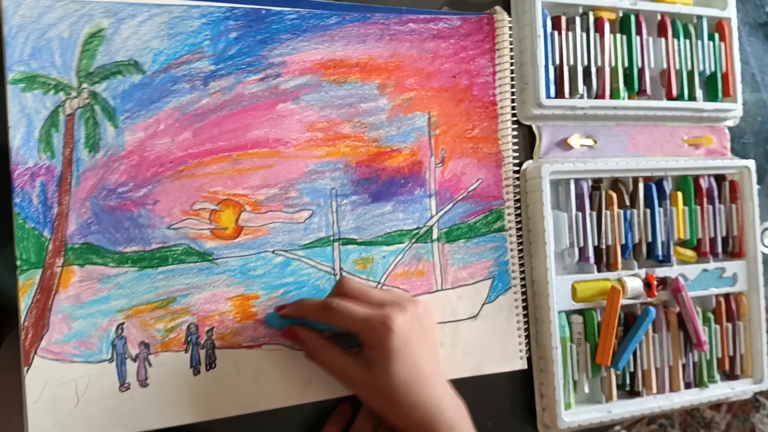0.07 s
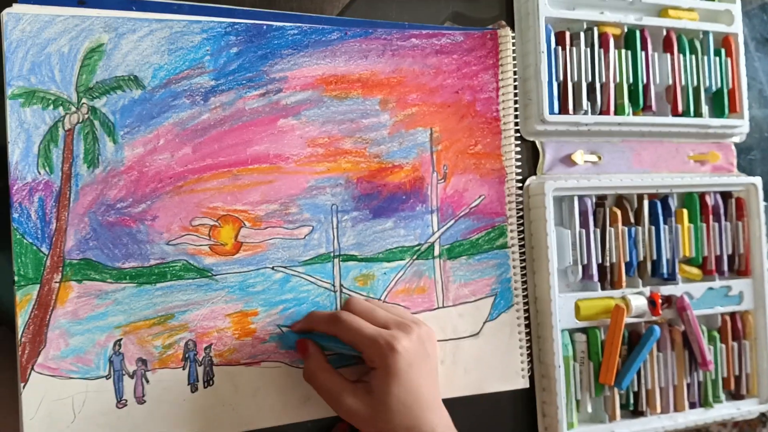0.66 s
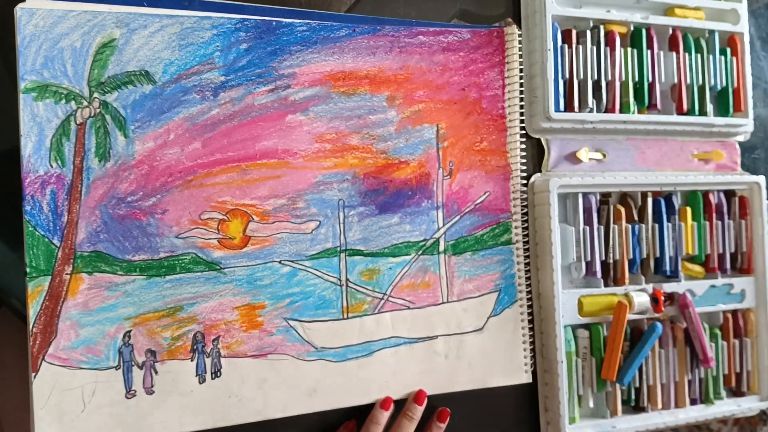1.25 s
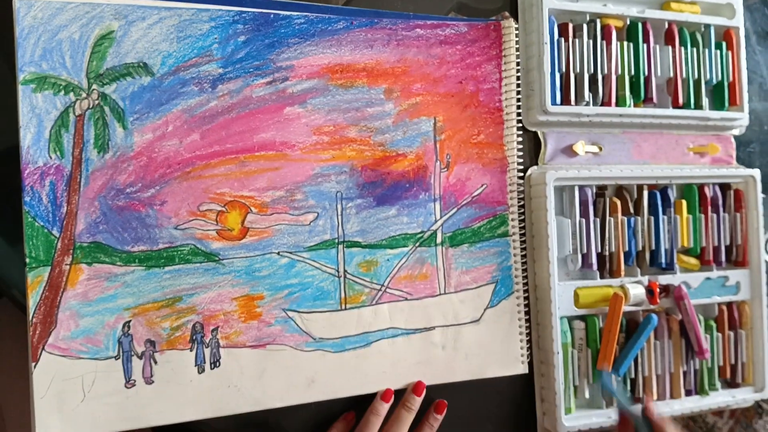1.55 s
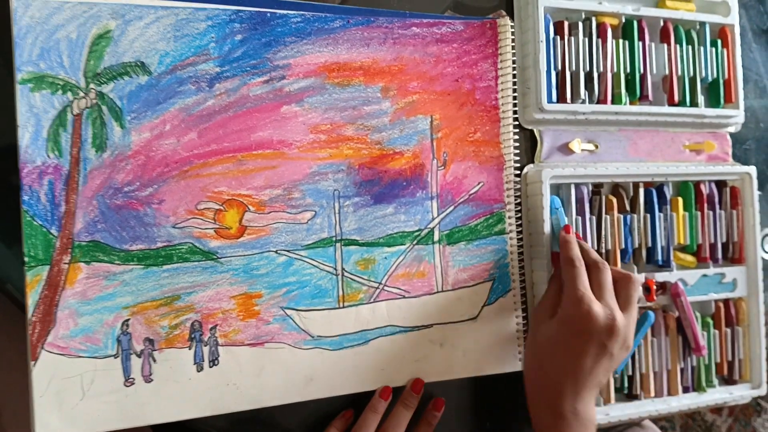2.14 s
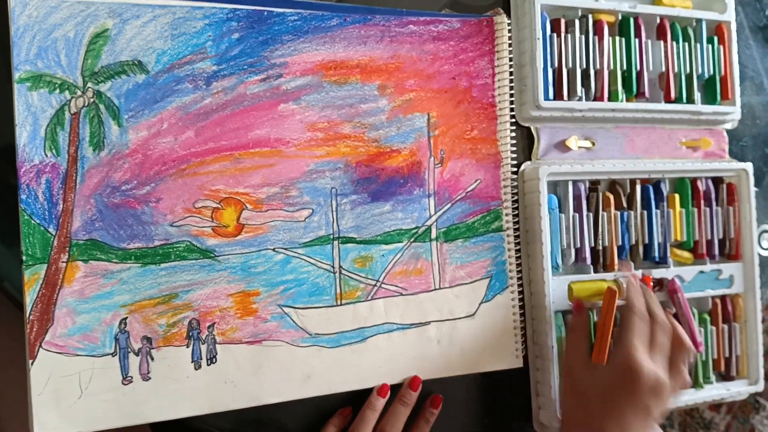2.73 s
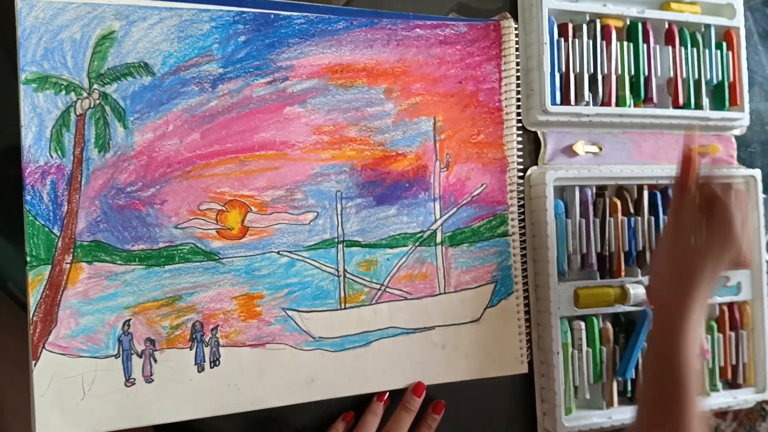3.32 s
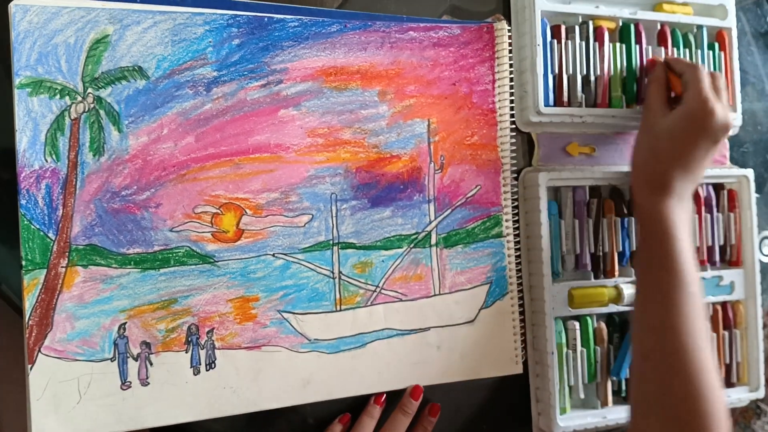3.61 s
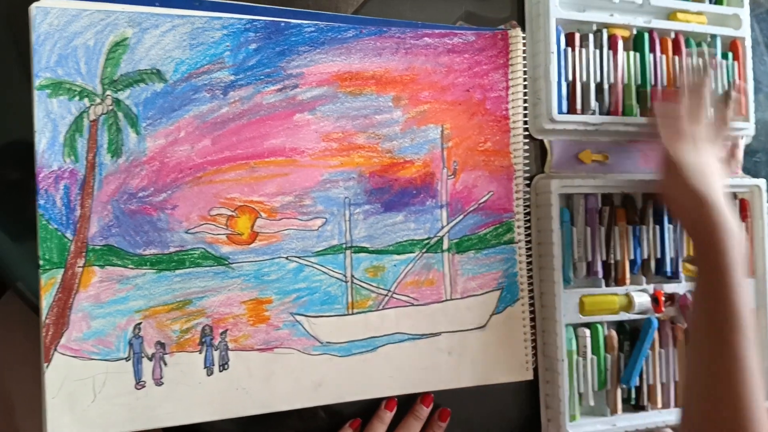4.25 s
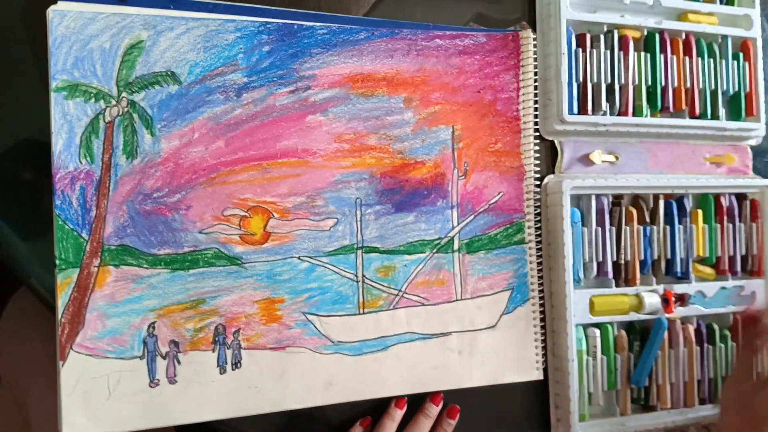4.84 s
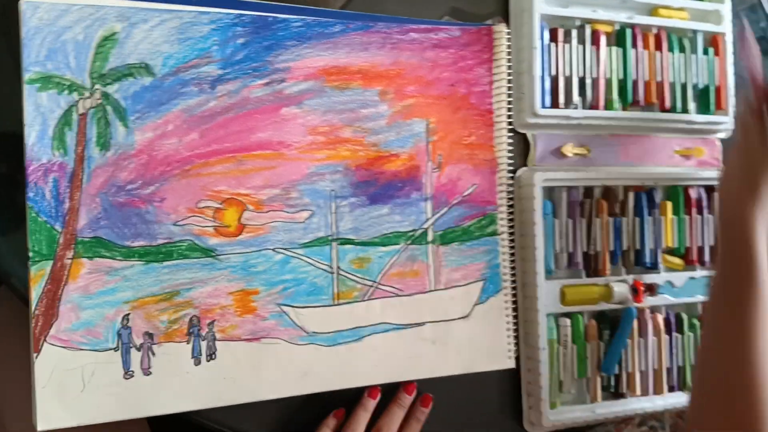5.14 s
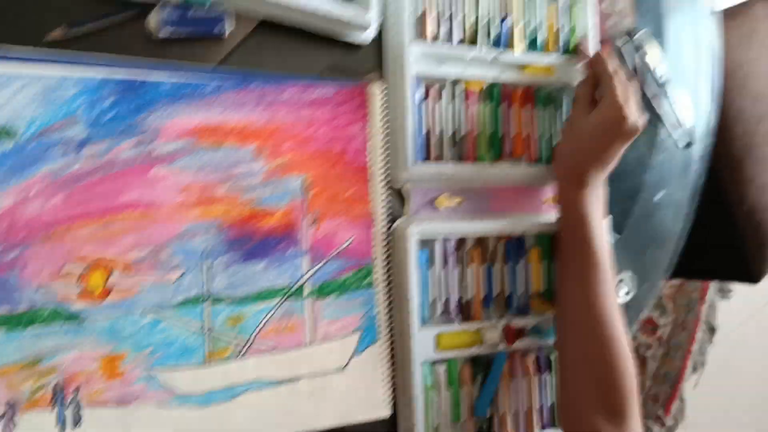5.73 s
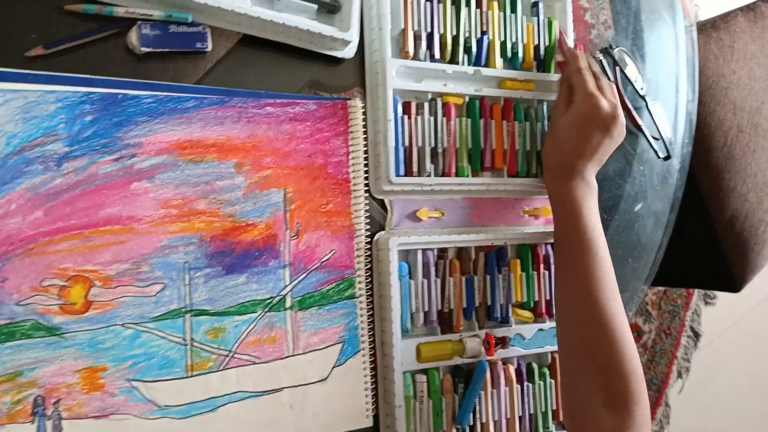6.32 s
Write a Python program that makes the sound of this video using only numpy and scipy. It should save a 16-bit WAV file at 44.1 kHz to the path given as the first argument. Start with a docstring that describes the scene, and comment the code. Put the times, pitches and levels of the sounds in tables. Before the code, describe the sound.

Oil pastel sticks click and scrape lightly in a plastic tray over the steady whir and hum of a fan.

```python
"""A fan whirs and hums in a small room: a turbulent rush of air over wavering motor tones.
Fingers brush and nails tick as oil pastels are put into a moulded plastic tray and picked out again.
Each stick clicks against its slot and its neighbours, and the impact excites the thin tray's modes.
Between clicks the sticks slide with a stick-slip rasp; now and then the hand bumps the desk."""
import sys
import numpy as np
from scipy import signal
from scipy.fft import rfft, irfft, next_fast_len
from scipy.io import wavfile
from scipy.ndimage import uniform_filter1d

SR = 44100
rng = np.random.default_rng(int(sys.argv[2]) if len(sys.argv) > 2 else 0)


def put_to_file(sound):
    """Save the sound as 16-bit audio at rate SR, in the file named by the first command-line argument."""
    columns = np.atleast_2d(sound).T  # one column per channel
    safe = np.clip(columns, -1, 1)
    whole_steps = np.round(safe * 32767)
    wavfile.write(sys.argv[1], SR, whole_steps.astype(np.int16))


N = 289737

# spectrum of the touch, with a faint added sheen near 15 kHz: (frequency [Hz], relative level [dB])
TOUCH_SPECTRUM = [(500, -5.5), (3200, 9.5), (6300, -3), (8000, -20.5), (9300, -21.5), (11500, -33),
                  (13500, -20), (15000, -8), (17000, -21)]


def amp(db):
    """Amplitude ratio of a level in decibels."""
    return 10 ** (np.asarray(db) / 20)


def unit(x):
    """Normalisation to rms 1."""
    return x / np.sqrt(np.mean(x ** 2) + 1e-20)


def curve(points, hz):
    """Interpolation on a logarithmic frequency axis."""
    f, value = np.transpose(points)
    return np.interp(np.log(hz + 1), np.log(f + 1), value)


def add(mix, s, sound):
    """Superposition of a sound starting at time s."""
    part = mix[max(round(s * SR), 0):][:len(sound)]
    part += sound[:len(part)]


def colour(x, db_at):
    """Zero-phase filtering by a function from Hz to dB."""
    size = next_fast_len(len(x))
    gain = amp(db_at(np.fft.rfftfreq(size, 1 / SR)))
    return irfft(rfft(x, size) * gain, size)[:len(x)]


def wander(rate_hz):
    """Random modulation: low-passed noise of rms 1."""
    return unit(colour(rng.standard_normal(N), lambda hz: -40 * np.log10(1 + (hz / rate_hz) ** 2)))


def impulse(gain):
    """Minimum phase: the most sudden causal pulse with this spectrum."""
    log_gain = np.log(np.r_[gain, gain[-2:0:-1]] + 1e-6)
    return np.fft.ifft(np.exp(np.conj(signal.hilbert(log_gain)))).real


def fan_air(level_db=-43, flutter_db=0.4):
    """Flow noise: a broadband rush with spectral peaks; a faint sheen rides near 15 kHz."""
    # spectrum of the rush: (frequency [Hz], relative level [dB])
    spectrum = [(25, -50), (50, -19.5), (95, -13), (160, 2), (260, -6.5), (420, 0.5), (700, -9), (1000, -7),
                (2100, -17.5), (3200, -14), (4600, -25.5), (6000, -31), (8000, -55), (11000, -65)]
    # peaks and one dip of the rush, plus a faint added sheen near 15 kHz: (frequency [Hz], width [Hz], gain
    # [dB])
    peaks = [(94, 19, 6), (203, 45, 2.5), (512, 56, 2.5), (892, 109, 5.5), (1170, 173, 5), (1420, 97, -4),
             (1564, 265, 7.5), (1880, 136, 5.5), (2240, 340, 3.5), (3030, 180, 1.5), (15200, 1300, 16.5)]

    def air_db(hz):
        peaks_db = sum(db * np.exp(-2 * ((hz - f) / width) ** 2) for f, width, db in peaks)
        return curve(spectrum, hz) + peaks_db

    envelope = amp(level_db + flutter_db * wander(rate_hz=14))
    rush = colour(rng.standard_normal(N), air_db)
    return envelope * unit(eddies(rush))


def eddies(x, patchy_db=2.5, below_hz=1900):
    """Turbulence lifts and drops narrow bands of the low rush for about a tenth of a second."""
    hz, _, spectra = signal.stft(x, SR, nperseg=1024)
    patches = uniform_filter1d(rng.standard_normal(spectra.shape), size=4, axis=0)  # across frequency
    patches = unit(uniform_filter1d(patches, size=10, axis=1))  # across time
    depth_db = patchy_db / (1 + (hz / below_hz) ** 2)
    return signal.istft(spectra * amp(depth_db[:, None] * patches), SR, nperseg=1024)[1][:N]


def fan_hum(waver_db=5.0, drift_rad=0.96):
    """Random amplitude and phase modulation roughens the motor's tones."""
    # motor tones: (frequency [Hz], rms level before the swell [dB], share of the swell [dB/dB])
    tones = [(198, -55.5, 0.035), (260.3, -61.5, 0.34), (328.2, -50.5, 0.75), (392.3, -56, 0.27),
             (457, -62, -0.11)]
    # slow swell and sinking of the hum: (time [s], level [dB])
    swell = [(0, -3.5), (1.95, 0), (2.45, -6), (3.05, -15), (3.6, 3.5), (4, -5), (4.25, 6), (5.1, -5),
             (5.35, 3.5), (5.75, 3.5), (6, -6), (6.57, 0)]
    hum, t = np.zeros(N), np.arange(N) / SR
    swell_db = np.interp(t, *np.transpose(swell))
    for hz, db, share in tones:
        waver = amp(waver_db * wander(rate_hz=20))
        phase = 2 * np.pi * hz * t + drift_rad * wander(rate_hz=13)
        hum += amp(db + share * swell_db) * unit(waver * np.sin(phase))
    return hum


def fingers(scratch_db=4.0):
    """Friction noise: a hiss that swells and fades, scratchy as the skin grips and slips."""
    # strokes over paper and sticks: (centre time [s], duration [s], level [dB])
    brushes = [(0.4, .08, -65), (1.38, 0.065, -64), (3.036, 0.057, -60), (3.75, 0.18, -67), (4.1, .14, -65),
               (4.817, .06, -57), (6.2, 0.05, -59), (6.31, 0.039, -61), (6.4, 0.06, -56.5),
               (6.51, 0.074, -65)]
    t = np.arange(N) / SR
    touch = sum(amp(db) * np.exp(-2 * ((t - s) / length) ** 2) for s, length, db in brushes)
    grain = rng.standard_normal(N) * amp(scratch_db * wander(rate_hz=150))
    return touch * unit(colour(grain, lambda hz: curve(TOUCH_SPECTRUM, hz)))


def nails(ring_db=14, width_hz=600):
    """Impulse excitation: a nail catching on a stick gives a dry tick with one high resonance."""
    # nail catches: (time [s], energy level [dB], resonance [Hz])
    catches = [(1.0602, -34, 9300), (3.078, -37, 7600), (3.7437, -28, 4370), (4.7738, -33, 7600),
               (4.8165, -34, 9400), (4.9858, -42, 9000), (6.287, -35, 8200)]
    out, hz = np.zeros(N), np.fft.rfftfreq(512, 1 / SR)
    for s, energy_db, ring_hz in catches:
        resonance_db = ring_db * np.exp(-((hz - ring_hz) / width_hz) ** 2)
        tick = impulse(amp(curve(TOUCH_SPECTRUM, hz) + resonance_db))
        add(out, s, amp(energy_db) * tick / np.linalg.norm(tick))
    return out


def desk(rise_s=0.011, t60=0.2):
    """Damped oscillation: the soft hand sets the desk top booming."""
    # bumps of the hand: (time [s], peak level [dB], frequency [Hz])
    bumps = [(1.455, -42.5, 172.6), (1.946, -43, 207), (2.0, -42, 207), (4.255, -34.5, 189),
             (4.332, -41, 151), (4.524, -40, 205), (4.549, -45, 309), (5.39, -35, 142.4)]
    out, t = np.zeros(N), np.arange(SR // 2) / SR
    for s, db, hz in bumps:
        envelope = (1 - np.exp(-t / rise_s)) * amp(-60 * t / t60)
        boom = envelope * np.sin(2 * np.pi * hz * t)
        add(out, s, amp(db) * boom / abs(boom).max())
    return out


def click(force_db, knock_hz, octaves, floor_db, tilt_db, edge_db, overtone_hz, overtone_db):
    """Impact of energy 1: the stick's knock and overtone, the tray floor and an edge add in power."""
    # response of the thin tray floor: (frequency [Hz], relative level [dB])
    floor_spectrum = [(100, -35), (450, -3), (800, -10), (1180, 3.5), (1550, -4.5), (1950, -13),
                      (3000, -82)]
    # edge tick, with a faint added sheen near 15 kHz: (frequency [Hz], relative level [dB])
    edge_spectrum = [(300, -15.5), (2000, -2), (4000, 1.5), (5000, -1), (6300, -14), (7300, -19.5),
                     (9000, -32.5), (12500, -45), (15000, -22.5), (17000, -29.5)]
    hz, t = np.fft.rfftfreq(2048, 1 / SR) + 1, np.arange(2048) / SR
    knock = 1 / (1 + abs(np.log2(hz / knock_hz) / octaves) ** 5)
    overtone = amp(overtone_db) / (1 + ((hz - overtone_hz) / 380) ** 4)  # half-width 380 Hz
    floor = amp(floor_db + curve(floor_spectrum, hz) + tilt_db * np.log2(np.maximum(hz, 300) / 1100))
    # the very top of the tick grows less than the rest on loud clicks
    top_cut_db = 0.16 * force_db * np.clip((hz - 9000) / 5000, 0, 1)
    edge = amp(edge_db + curve(edge_spectrum, hz) - top_cut_db)
    pulse = impulse(np.sqrt(knock ** 2 + overtone ** 2 + floor ** 2 + edge ** 2))
    # dispersion: bending waves in the tray carry the treble faster than the bass
    lag_cycles = 0.000918 * np.sqrt(hz * knock_hz)
    pulse = irfft(rfft(pulse) * np.exp(-2j * np.pi * lag_cycles))
    pulse *= np.minimum(2 - 2 * t / t[-1], 1) ** 2  # fade over the second half
    add(pulse, 0.0013, 0.056 * pulse)  # reflection from a near surface
    return pulse / np.linalg.norm(pulse)


def tray(blow, coupling_db=-23):
    """Modal response: the tray rings as a sum of damped sinusoids."""
    # tray modes: (frequency [Hz], relative level [dB], T60 [s])
    modes = [(487, -21, 0.11), (694, -17, 0.18), (940, -24.5, 0.24), (1164, -28, 0.14), (1220, -35, .1),
             (2100, -35, .12), (3020, -47, 0.1), (3480, -45, .08)]
    t = np.arange(SR // 2) / SR
    ring = sum(amp(db - 60 * t / t60) * np.cos(2 * np.pi * hz * t) for hz, db, t60 in modes)
    return amp(coupling_db) * signal.fftconvolve(blow, ring)


def chatter(blow, t60=0.012, rise_s=0.0009):
    """Rebounds: the stick rattles in its slot for a few milliseconds after a blow."""
    t = np.arange(len(blow)) / SR
    contacts = rng.standard_normal(len(t)) * amp(-60 * t / t60) * (1 - np.exp(-(t / rise_s) ** 2))
    return np.std(blow) * unit(signal.fftconvolve(blow, contacts)[:len(t)])


def sticks(middling_db=-1, ring_db=-7.5, chatter_db=-4.5):
    """Excitation and response: each blow drives the tray, a rattle and the room from its own spot."""
    # sticks striking the tray and each other: (time [s], energy level [dB], knock frequency [Hz],
    # knock half-width [octaves], floor gain [dB], floor tilt [dB/octave], edge gain [dB],
    # overtone frequency [Hz], overtone gain [dB])
    impacts = [ (1.458, -7.5, 2420, .24, -8.5, 6, -28, 3480, -6),
               (1.9537, 1, 3130, 0.37, -6.5, -2.5, -21, 7200, -25),
               (1.955, -6.5, 3700, 0.19, -4, -5, -10, 5070, -11),
               (1.9747, -5.5, 3180, 0.51, -3.5, -6.5, -18, 6950, -24),
               (2.006, -14.5, 3110, .19, -4, 1, -22, 3730, -14),
               (2.0207, -10, 3600, .26, -8, 6, -18, 5090, -15),
               (2.037, -11, 3270, 0.29, -9, 10, -13, 7420, -25),
               (2.2865, -20, 3400, .46, -14, -2, -10, 4390, -1),
               (2.3087, 7, 2810, 0.22, -2.5, 4, -9.5, 4650, -9),
               (2.3115, -1, 2300, .2, 10, -1.5, -14, 5100, 0),
               (2.4697, -4, 3310, 0.44, -20, 2, -19, 6740, -20),
               (2.516, -12.5, 3580, .25, 0, 6, -13, 3970, 4),
               (2.5274, 6, 3500, 0.31, -8, -1.5, -19.5, 5580, -26),
               (3.0424, -16.5, 3460, .24, -4, 3, -13, 4890, -11),
               (3.131, -19.5, 3840, 0.79, -12, 0, 0, 3350, 6),
               (3.1455, -13, 3200, .17, -26, 4, -12, 3830, -2),
               (3.5167, -5, 2980, 0.59, -10, 1, -12, 6060, -10),
               (3.5267, -6, 2380, 0.3, -12, -2, -8, 3600, -1),
               (3.545, -12.5, 2660, 0.47, -11, -8, -9, 6220, -17),
               (3.8464, -17, 3470, .31, -2, 7, -21, 3750, 1),
               (3.8706, -0.5, 3100, .37, 8.5, 1.5, -12, 3450, 5.5),
               (4.0823, -11, 3440, 0.33, 8.5, 10, -0.5, 5500, -11),
               (5.3776, -6.5, 2270, .33, 4, 0, -13, 3370, 4),
               (5.3835, -5, 3300, 0.26, 5, -2, -9.5, 2080, 0), (6.133, -16, 2560, 0.52, 6, 1, -17, 3170, 4),
               (6.139, -10.5, 2190, .46, -4, 1, -7.5, 3200, 6)]
    out = np.zeros(N)
    for s, energy_db, *timbre in impacts:
        force_db = energy_db - middling_db
        blow = amp(energy_db) * click(force_db, *timbre)
        add(out, s, blow)
        add(out, s, amp(ring_db + 0.59 * force_db) * tray(blow))  # a firm blow rings the tray more
        add(out, s, amp(chatter_db) * chatter(blow))
        add(out, s, room(blow, wet_db=-13.5))
    return out


def slides(slips_per_s=3000, spread_db=5.5, plain_db=-48.5):
    """Stick-slip friction: a sliding pastel catches and lets go in many tiny pulses."""
    # slides in the slots: (time [s], duration [s], level [dB])
    strokes = [(1.964, 0.06, -39.5), (2.296, 0.014, -37), (2.456, 0.13, -42), (3.097, 0.066, -61),
               (3.51, 0.091, -49.5), (3.82, 0.1, -49), (4.063, 0.055, -48), (5.365, 0.069, -41),
               (6.12, 0.1, -56)]
    # the rasp, with a faint added sheen near 15 kHz: (frequency [Hz], relative level [dB])
    spectrum = [(300, -3.5), (2000, -2.5), (3400, 2.5), (4500, -7), (6500, -11.5), (8000, -33),
                (12500, -45), (15000, -22), (17000, -48)]
    slips = (rng.random(N) < slips_per_s / SR) * rng.choice([-1, 1], N)
    slips = slips * amp(spread_db * np.minimum(rng.exponential(1, N), 3))
    out = np.zeros(N)
    for s, length, db in strokes:
        tilt_db = 0.5 * (plain_db - db)  # per octave: a light slide is brighter than a pressed one
        stroke = slips[round(s * SR):][:round(length * SR)]
        rasp = colour(stroke, lambda hz: curve(spectrum, hz) + tilt_db * np.log2(np.clip(hz, 1000, 9000)))
        add(out, s, amp(db) * unit(rasp) * np.hanning(len(rasp)) ** .5)
    return out


def room(x, wet_db=-11, build_s=0.0059, dull_hz=7200):
    """Reverberation: reflections build up quickly, lose top treble and decay band by band."""
    # reverberation times: (frequency [Hz], T60 [s])
    decay_times = [(200, 0.11), (1000, 0.31), (3500, 0.16), (7000, 0.32), (15000, 0.2)]
    hz, t, spectra = signal.stft(rng.standard_normal(SR // 2), SR, nperseg=256)
    shelf = 1 / (1 + (hz / dull_hz) ** 12) + .3
    decay = amp(-60 * t / curve(decay_times, hz)[:, None])
    tail = signal.istft(spectra * shelf[:, None] * decay, SR, nperseg=256)[1]
    tail *= 1 - np.exp(-(np.arange(len(tail)) / SR / build_s) ** 2)
    return amp(wet_db) * signal.fftconvolve(x, tail / np.linalg.norm(tail))


def scene(low_cut_hz=220):
    """Superposition of pastels, desk and fan; the tray is too small to radiate bass."""
    rubbing = slides() + fingers()
    pastels = sticks() + nails() + rubbing + room(rubbing)[:N]
    low_cut = signal.butter(2, low_cut_hz, "highpass", fs=SR, output="sos")
    return (signal.sosfilt(low_cut, pastels) + desk() + fan_air() + fan_hum())[None]


def record(dry):
    """Band limiting: a linear-phase low-pass at 15950 Hz."""
    low_pass = signal.firwin(511, 15950, window=("kaiser", 9), fs=SR)
    return signal.oaconvolve(dry, low_pass[None], "same")


dry = scene()
out = record(dry)
put_to_file(out)
```